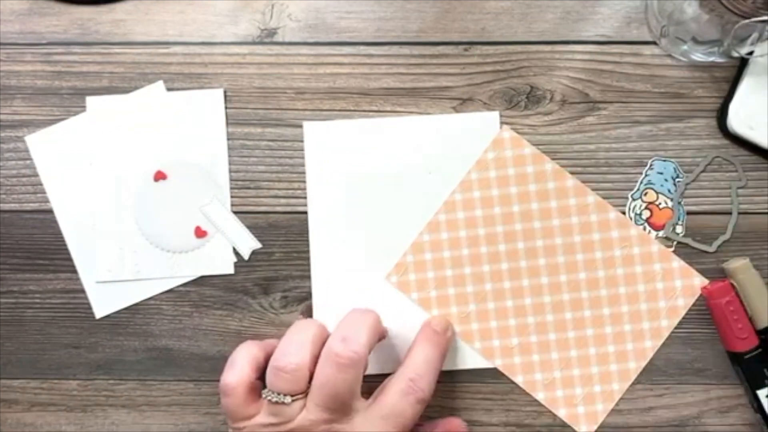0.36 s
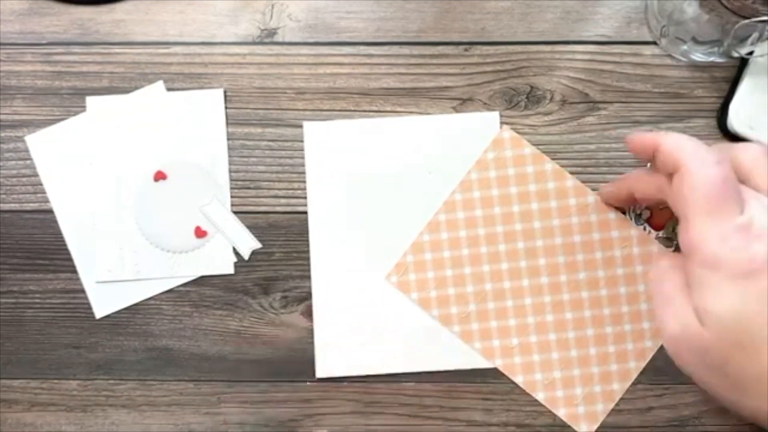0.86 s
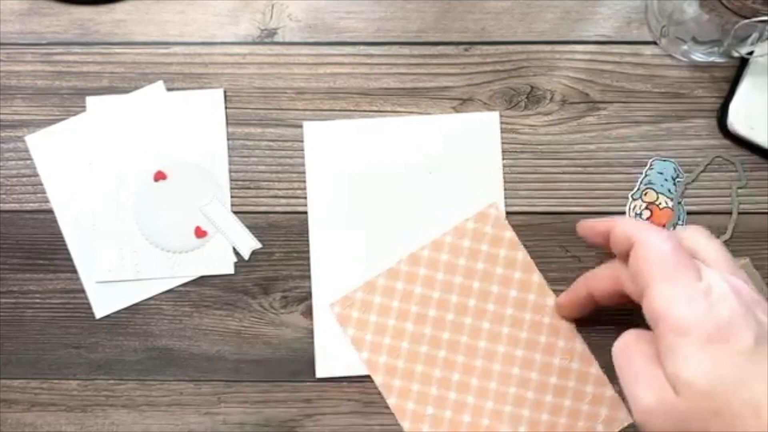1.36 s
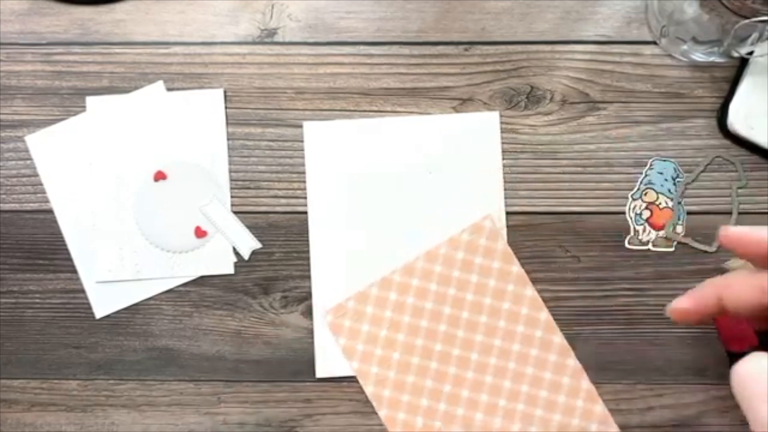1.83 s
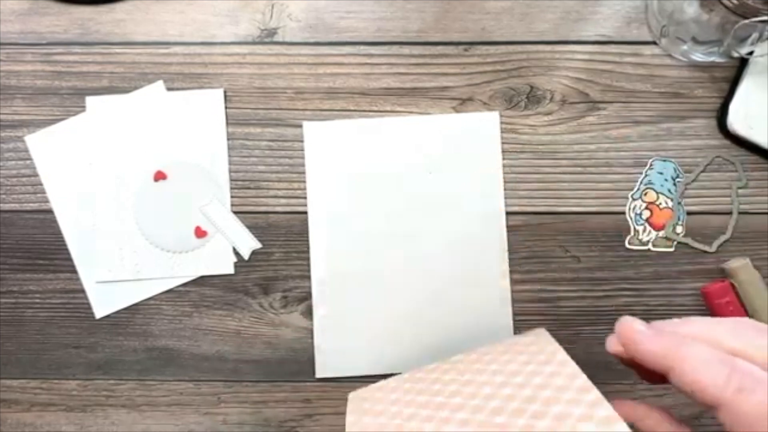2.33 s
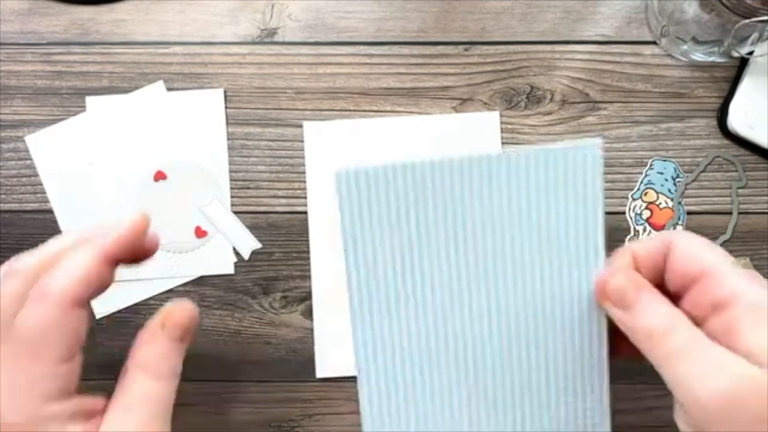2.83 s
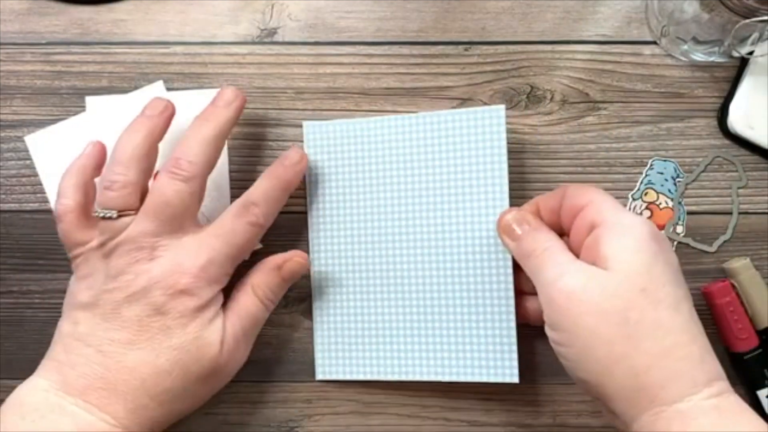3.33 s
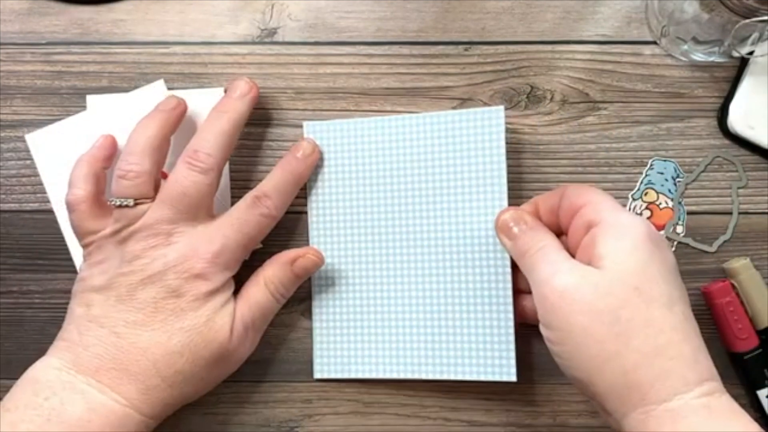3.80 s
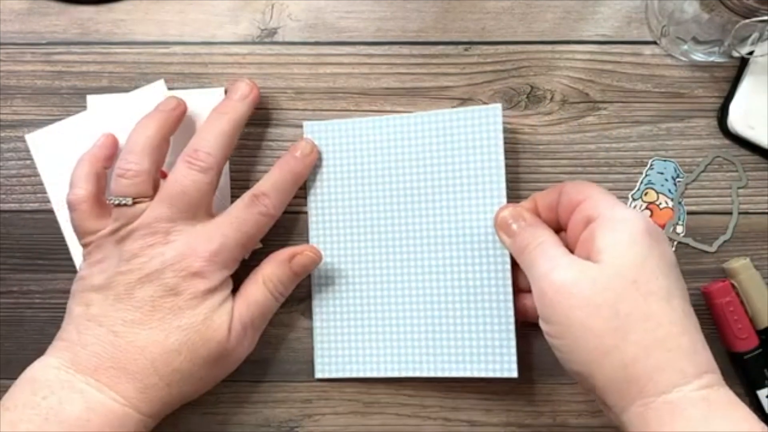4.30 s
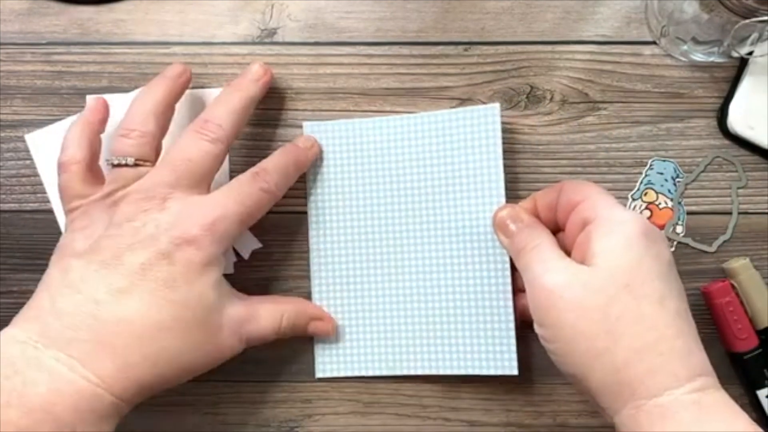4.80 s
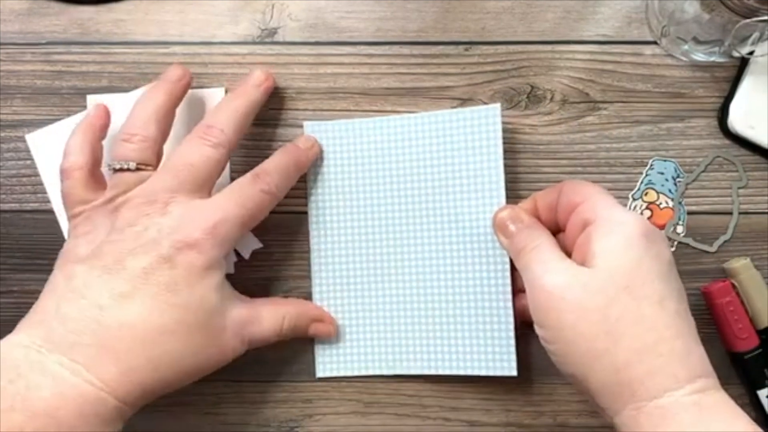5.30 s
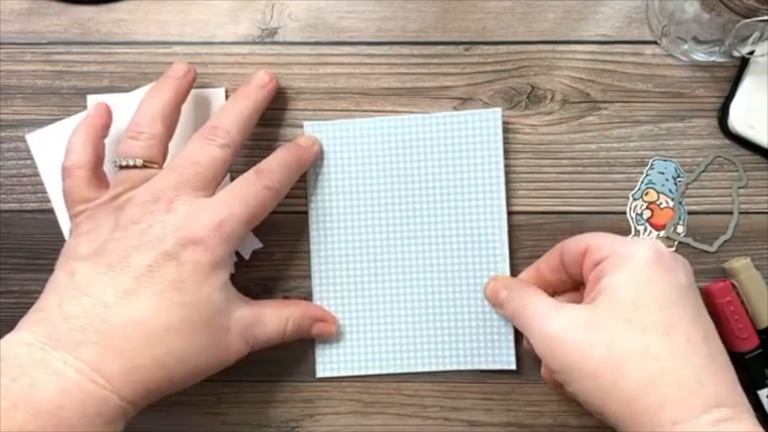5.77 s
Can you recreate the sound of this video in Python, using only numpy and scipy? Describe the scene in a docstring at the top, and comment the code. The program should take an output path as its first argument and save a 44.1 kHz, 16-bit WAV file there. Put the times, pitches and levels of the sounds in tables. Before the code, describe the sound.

Close stereo pickup of a wooden table in a quiet room. Faint paper rustle and crisp edge snaps lead to a loud hard knock with quick bounces. Paper then hisses across the wood in several strokes, with a firm fingertip thump between. Softer finger taps follow, then tiny dry card nudges that fade away, and finally one short ringing card scrape over a low rumble.

```python
"""Close above a wooden table in a quiet room: a sheet of paper is dragged over the wood and its edges snap,
fingertips thump down, something hard knocks and bounces, and a card is nudged and slid over another card.
Blows ring the modes of the table top; rubbing is clumped noise, hissing for paper and ringing for the card.
A low room rumble and a faint hiss lie under it all."""
import sys
import numpy as np
from scipy import signal
from scipy.fft import rfft, irfft
from scipy.io import wavfile
from scipy.ndimage import uniform_filter1d

SR = 44100
rng = np.random.default_rng(int(sys.argv[2]) if len(sys.argv) > 2 else 0)


def int16_out(signal):
    """Quantize to a 16-bit WAV file."""
    q = np.round(np.clip(np.atleast_2d(signal).T, -1, 1) * 32767)
    wavfile.write(sys.argv[1], SR, q.astype(np.int16))


def nominal_scale(level):
    """Amplitude ratio for a level in decibels (scalar or array-like)."""
    x = np.asarray(level, float) / 20
    return 10 ** x


N = 271206  # length in samples


def evened(x):
    """Scales to rms 1."""
    return x / np.sqrt(np.mean(x ** 2) + 1e-20)


def read(points, hz):
    """Reads a table on a log-frequency axis."""
    f, value = np.transpose(points)
    return np.interp(np.log(hz + 1), np.log(f + 1), value)


def spectrum(points):
    """A gain function from a dB table."""
    return lambda hz: nominal_scale(read(points, hz))


def add(mix, s, sound):
    """Mixes a stereo sound in at s seconds."""
    part = mix[:, round(s * SR):][:, :sound.shape[1]]
    part += sound[:, :part.shape[1]]


def coloured(pair, gain, same):
    """Two unrelated signals become a stereo pair of given spectrum and likeness, at rms 1."""
    hz = np.fft.rfftfreq(pair.shape[1], 1 / SR)
    a, b = rfft(pair) * gain(hz)
    likeness = np.clip(read(same, hz), -1, 1)
    right = likeness * a + np.sqrt(1 - likeness ** 2) * b
    return evened(irfft(np.array([a, right]), pair.shape[1]))


# stereo image of the near sources: pitch_hz, likeness (left to right, 1 = same)
NEAR_LIKENESS = [(60, 0.99), (180, 1), (550, 0.76), (1650, 0.79), (4500, 0.46)]


def near(pair, gain):
    """A coloured pair with the stereo image of a source close to the microphone."""
    return coloured(pair, gain, NEAR_LIKENESS)


def fibres(spread_db, clump_db, clump_s):
    """Friction: countless fibre slips of uneven size that come in clumps."""
    size = nominal_scale(spread_db * np.minimum(rng.exponential(1, (2, N)), 5))
    smooth = np.exp(-(np.arange(-900, 900) / SR / clump_s) ** 2)
    clumps = evened(signal.oaconvolve(rng.standard_normal(N), smooth, "same"))
    return rng.standard_normal((2, N)) * size * nominal_scale(clump_db * clumps)


def stroke(times, db):
    """Gain over time of one hand stroke; silent before and after."""
    t = np.arange(N) / SR
    moving = (t >= times[0]) & (t < times[-1])
    return uniform_filter1d(nominal_scale(np.interp(t, times, db)) * moving, size=200)


# colour of rumble and hiss: pitch_hz, level_db (relative)
AIR_COLOUR = [(12, -40), (20, -9.5), (37, -2.5), (86, -2), (182, -19), (270, -19.5), (558, -27.5),
              (660, -30), (1090, -32), (1220, -34.5), (2320, -35), (2750, -36.5), (16000, -48.5)]
# stereo image of the air: pitch_hz, likeness (left to right)
AIR_LIKENESS = [(60, 0.63), (180, -0.2), (550, 0.25), (1650, -0.12)]


def air():
    """Room rumble and hiss, swelling a little on slow waves of 0.3 to 5 Hz."""
    t = np.arange(N) / SR
    level_db, swell_db = -68.5, 0.76
    waves = (np.sin(2 * np.pi * (f * t + rng.random())) / np.sqrt(f) for f in np.geomspace(.3, 5, 20))
    swell = evened(sum(waves))
    noise = coloured(rng.standard_normal((2, N)), spectrum(AIR_COLOUR), AIR_LIKENESS)
    return nominal_scale(level_db + swell_db * swell) * noise


# passes of paper over wood, one list each: start_s, hiss_db, body_db (before the trims below)
DRAG_PASSES = [
    [(0.0, -83, -66.5), (0.09, -89, -68.5), (0.212, -73.5, -71), (0.3, -81, -81.5), (0.336, -81, -96),
     (0.38, -67.5, -82), (0.4, -80, -79.5), (0.428, -85.5, -73.5)],
    [(0.8, -99.5, -86.5), (0.862, -86.5, -84.5), (0.894, -70.5, -81), (0.94, -85.5, -78), (0.99, -58, -76),
     (1.05, -63, -75.5), (1.19, -60, -76), (1.27, -62, -73.5), (1.36, -62.5, -79.5), (1.492, -72.5, -81),
     (1.538, -102, -91)],
    [(1.742, -81, -87), (1.786, -77, -78), (1.892, -82, -77.5), (1.966, -71.5, -87.5), (2.02, -82.5, -102),
     (2.048, -71.5, -82), (2.082, -82, -80), (2.11, -78, -71.5), (2.145, -61.5, -78), (2.205, -64.5, -79.5),
     (2.244, -95, -94), (2.3, -106, -100)],
    [(2.35, -105, -105), (2.396, -92, -82), (2.446, -104, -90.5), (2.476, -83, -79.5), (2.514, -105, -90),
     (2.62, -81, -84.5), (2.646, -76, -77.5), (2.742, -92.5, -78.5), (2.79, -104, -87.5)],
]
# colour of paper on grain: pitch_hz, level_db (relative)
DRAG_HISS_COLOUR = [(900, -39), (1500, -16), (3000, 1.5), (4800, 3), (7200, -2), (11000, -6.5), (14000, -9),
                    (15500, -19)]
# colour of the dull flapping sheet: pitch_hz, level_db (relative)
SHEET_COLOUR = [(500, -32), (800, -4), (1400, -4.5), (2200, -7), (3500, -23.5)]
# extra treble hiss of the paper: level_db for each pass
TREBLE_DB = [-7, -5.5, -5.5, -28]


def drags():
    """Fine slips hiss on the grain, with the duller flap of the sheet in coarser ones."""
    hiss = near(fibres(1.4, 1.7, .004), spectrum(DRAG_HISS_COLOUR)) * nominal_scale([[3.5], [2.5]])
    body = near(fibres(2.5, 1.5, 0.0066), spectrum(SHEET_COLOUR)) * nominal_scale(2.5)
    treble_hz = 7600
    treble = signal.lfilter(*signal.butter(2, treble_hz, 'high', fs=SR), hiss)
    out = np.zeros((2, N))
    for rows, treble_db in zip(DRAG_PASSES, TREBLE_DB):
        s, hiss_db, body_db = np.transpose(rows)
        out += (hiss + nominal_scale(treble_db) * treble) * stroke(s, hiss_db)
        out += body * stroke(s, body_db)
    return out


# colour of the shaken table top: pitch_hz, level_db (relative)
MURMUR_COLOUR = [(60, -13), (150, -4), (300, -4.5), (470, -2.5), (650, -12.5), (1000, -40.5)]
# table murmur over the sheet body, low while the sheet is being lifted: level_db for each pass
DRAG_WEIGHT = [4.5, 10, -12, 5.5]


def murmur():
    """Every stroke shakes the table top a little, heard as low noise."""
    shake = near(rng.standard_normal((2, N)), spectrum(MURMUR_COLOUR))
    dragged = np.zeros(N)
    for rows, weight_db in zip(DRAG_PASSES, DRAG_WEIGHT):
        s, _, body_db = np.transpose(rows)
        dragged += stroke(s, body_db + weight_db)
    slide_db, fade_db_per_s, swell_in_s = -67, -25.5, 0.02  # murmurs most as the slide sets off
    slide = np.array([SLIDE_PATH[1][0], SLIDE_PATH[-1][0]])
    slid = stroke(slide, slide_db + fade_db_per_s * (slide - slide[0]))
    slid = slid * np.clip((np.arange(N) / SR - slide[0]) / swell_in_s, 0, 1)
    nudge_db = -5.5  # against the card's ring
    return shake * (dragged + slid + nominal_scale(nudge_db) * pushes())


# small snaps of paper edges: start_s, level_db (before a 5 dB cut), low_ring_hz, high_ring_hz,
# pan_db (left over right)
EDGE_SNAPS = [(0.0338, -42.5, 2650, 10550, 9), (0.0442, -36.5, 2480, 4310, 2), (0.124, -67, 1570, 6800, -3),
              (0.1391, -59, 4900, 6800, -7), (0.192, -34, 10100, 14800, -7),
              (0.2163, -29.5, 9600, 12760, 0), (0.2266, -39, 10200, 14700, 3),
              (0.2445, -50, 2530, 4360, -4), (1.4033, -49.5, 2340, 2940, 0), (2.387, -65, 2750, 4290, 3),
              (2.47, -66, 2905, 4360, 14), (2.645, -57.5, 2510, 3720, 8), (2.665, -60, 2760, 5080, 11),
              (3.335, -69.5, 1050, 1926, 1.5), (3.3902, -71, 1060, 1700, 10), (3.4955, -76, 1960, 4140, 4),
              (3.7642, -61, 2140, 7160, 6), (4.7603, -66.5, 2240, 2530, 4), (5.4665, -56, 2273, 2895, 9),
              (5.623, -44, 2280, 3900, 8), (5.8421, -62, 2426, 3670, 2)]


def snaps():
    """Each snap is a wide puff with two short rings; the higher its upper ring, the sooner it dies."""
    out, t = np.zeros((2, N)), np.arange(2048) / SR
    t60_at_4khz_s, rise_s, ring_width = 0.034, .0005, 0.038  # width as a share of the ring pitch
    for s, db, low_hz, high_hz, pan_db in EDGE_SNAPS:
        def colour(hz):
            """A flat puff above 800 Hz with two peaks."""
            rings = sum(1 / (1 + ((hz / ring_hz - 1) / ring_width) ** 2) for ring_hz in (low_hz, high_hz))
            return (hz > 800) * (0.079 + rings)

        puff = near(rng.standard_normal((2, 2048)), colour)
        t60_s = t60_at_4khz_s * 4000 / high_hz
        shape = nominal_scale(db - 5 - 60 * t / t60_s) * np.minimum(t / rise_s, 1)
        add(out, s, puff * shape * nominal_scale([[pan_db / 2], [-pan_db / 2]]))
    return out


# what the table top rings with: pitch_hz, level_db, t60_s (left free),
# sideways (0 = centre, plus = left, minus = right; beyond 1 the far side flips sign)
TABLE_MODES = [(53.5, -7.5, 0.97, -0.29), (63.44, -10, 0.36, -0.24), (90.9, -3, 0.45, -1.7),
               (151, -0.5, .2, -1.1), (163.8, -5, 0.37, -0.22), (193.4, 1.5, 0.17, 1),
               (214.8, -3.5, 0.21, -0.94), (259.8, -10.5, 0.48, 0.48), (336, -9.5, 0.11, -1.1),
               (359, -3.5, 0.07, 0.64), (450.4, -10, 0.18, -0.087), (461, -10.5, 0.23, 0.14),
               (581, -11, 0.22, -.3), (576, -7.5, 0.063, -1.5), (657, -1, 0.069, 1),
               (707, -11.5, .08, 0.85), (743, -3, 0.059, -1.6), (852, -4, 0.08, .8), (967, -5, 0.17, -.6),
               (1050, -11, 0.23, 1), (1160, -10, 0.24, .4), (1270, -14.5, .07, -0.66),
               (1330, -16, 0.1, 0.29), (1717, -13, 0.098, 1), (2055, -11, .04, .7), (3100, -24, .05, .4)]
# colour of the hard contact itself: pitch_hz, level_db (relative)
CRACK_COLOUR = [(700, -21), (1200, -3.5), (2300, -15), (3300, -13), (5000, -19.5), (7000, -26.5),
                (11000, -34), (15500, -44)]


def blow(force_db, contact_ms, place, share, build_cycles, heft_db, crack_db):
    """A half-sine push rings the modes by where it lands; long soft contacts leave the high ones still."""
    t = np.arange(SR // 2) / SR
    hz, db, t60_s, sideways = np.transpose(TABLE_MODES)[:, :, None]
    resting_t60_s = 0.33  # arms resting on the top cut the longest rings short
    swell = 1 - np.exp(-(t * hz / build_cycles) ** 2)  # low bending waves are slow to build up
    decay = nominal_scale(db - 60 * t / (t60_s * share) - 60 * t / resting_t60_s)
    modes = swell * decay * np.sin(2 * np.pi * hz * t)
    # plate mode shape: wave number grows as the root of pitch
    struck = modes * np.sin(np.pi * place * np.sqrt(hz / 45))
    struck *= nominal_scale(heft_db / (1 + (hz / 150) ** 4))  # a heavy hand drives the whole top
    ring = np.array([((1 + sideways) * struck).sum(0), ((1 - sideways) * struck).sum(0)])
    push = np.sin(np.pi * np.clip(t[:600] / (contact_ms / 1000), 0, 1))
    thud = nominal_scale(force_db) * signal.oaconvolve(ring, push[None] / push.sum())[:, :len(t)]
    crack_t60_s, crack_rise_s = 0.036, 0.00056
    burst = nominal_scale(crack_db - 60 * t / crack_t60_s) * np.minimum(t / crack_rise_s, 1)
    crack = near(rng.standard_normal((2, 4096)), spectrum(CRACK_COLOUR))
    crack = np.pad(crack, ((0, 0), (0, len(t) - 4096)))
    return crack * burst - thud


# fingertips come down: start_s, force_db, contact_ms, place (struck, 0-1), heft_db (on the lowest modes),
# share (of the modes' t60, short where the finger stays down)
FINGER_THUMPS = [(0.356, -57.5, 2.2, 0.73, 18, 0.47), (1.731, -39, 2.87, 0.348, -5, 1.25),
                 (2.404, -55, 1.35, 0.525, -6.5, 0.88), (2.473, -53, 1.25, 0.51, -1, 0.59),
                 (2.904, -52, .9, 0.18, 7, 0.94), (2.918, -54, 1.6, 0.29, 4, 0.88),
                 (3.185, -46.5, 1.32, 0.805, 12, 0.9), (3.222, -55, 2.1, 0.82, 3.5, 1.25),
                 (3.522, -42.5, 1.95, 0.33, 2.5, 0.49), (5.888, -51, 5.9, 0.33, 4, 0.34)]


def thumps():
    """Soft, long contacts of the fingertips, each with the faint tick of the nail."""
    out = np.zeros((2, N))
    build_cycles, tick_db = 1.2, -36.5  # the tick lies far under the force
    for s, force_db, contact_ms, place, heft_db, share in FINGER_THUMPS:
        add(out, s, blow(force_db, contact_ms, place, share, build_cycles, heft_db, force_db + tick_db))
    return out


# a hard thing knocks and bounces: start_s, force_db, contact_ms, place (struck, 0-1), crack_db
BOUNCING_KNOCKS = [(0.429, -33, 0.23, 0.82, -33.5), (0.4331, -13, 0.97, 0.22, -22),
                   (.449, -21.5, 0.14, 0.5, -29), (0.4812, -29, 0.95, 0.4, -32.5),
                   (0.4939, -25, 0.78, 0.3, -32), (0.507, -36, 0.79, .27, -40),
                   (0.5438, -22, 0.46, 0.02, -39), (0.547, -45.5, 0.43, .25, -38)]


def knocks():
    """Short hard contacts; the drive of the lowest modes grows as the thing settles flat."""
    out = np.zeros((2, N))
    share, build_cycles = 0.79, .6  # share of the modes' t60
    first_heft_db, heft_db_per_s = -20.5, 89.5
    for s, force_db, contact_ms, place, crack_db in BOUNCING_KNOCKS:
        heft_db = first_heft_db + heft_db_per_s * (s - BOUNCING_KNOCKS[0][0])
        add(out, s, blow(force_db, contact_ms, place, share, build_cycles, heft_db, crack_db))
    return out


# short pushes of card on card: peak_s, length_s, push_db, main_ring_hz (as the card bends)
CARD_NUDGES = [(3.345, 0.033, -66, 1920), (3.391, 0.054, -69, 1850), (3.437, .12, -68.5, 1945),
               (3.506, 0.055, -64.5, 1910), (3.553, 0.072, -65, 2020), (3.685, 0.1, -77.5, 2030),
               (3.775, 0.044, -72.5, 2120), (3.82, 0.068, -76.5, 2070), (3.85, .06, -75.5, 2210),
               (3.973, 0.095, -72, 2020), (4.024, 0.034, -77.5, 1980), (4.152, 0.067, -83.5, 1960),
               (4.425, 0.11, -80, 2340), (4.768, 0.08, -75, 2222), (4.881, .08, -79, 2175),
               (4.938, .11, -75.5, 2200), (5.065, .05, -91, 2180)]


def pushes():
    """Gain of the short pushes: each swells quickly to its peak and fades."""
    rise, ends_db = 0.43, -17.5  # share of the length before the peak; both ends against the peak
    total = np.zeros(N)
    for s, length, db, _ in CARD_NUDGES:
        times = [s - rise * length, s, s + (1 - rise) * length]
        total += stroke(times, [db + ends_db, db, db + ends_db])
    return total


# stiff card resonances: ratio (to the main ring), width_hz, level_db (before a 13 dB lift),
# growth (dB gained per dB of pressure)
CARD_RINGS = [(0.552, 726, -15, -0.16), (0.803, 784, 0, 0.03), (0.999, 330, 11, 0.38), (1.1, 900, 1.5, 0.1),
              (1.35, 865, -4, 1.76)]


def card(slips, pressure):
    """The slips pass resonances that follow the bend of the card; pressure shifts their balance."""
    slide_hz = 2340
    bend = [(row[0], row[3]) for row in CARD_NUDGES]
    bend = sorted(bend + [(SLIDE_PATH[0][0], slide_hz), (SLIDE_PATH[-1][0], slide_hz)])
    start = round(bend[0][0] * SR) - 2048
    main_hz = np.interp(np.arange(start, N) / SR, *np.transpose(bend))
    pressure_db = 20 * np.log10(pressure[start:] + 1e-5)
    out = np.zeros((2, N))
    for ratio, width_hz, db, growth in CARD_RINGS:
        # shift the moving ring down to 0 Hz, low-pass it there, shift it back
        turn = np.exp(2j * np.pi * ratio * np.cumsum(main_hz) / SR)
        r = np.exp(-np.pi * width_hz / SR)
        ring = turn * signal.lfilter([(1 - r) ** 2], [1, -2 * r, r * r], slips[:, start:] / turn)
        out[:, start:] += nominal_scale(db + 13 + growth * (pressure_db + 54.5)) * ring.real
    return out


# the long slide of the card: start_s, pressure_db, hiss_db (relative to the pressure)
SLIDE_PATH = [(5.38, -92.5, -13.5), (5.422, -74.5, -5.5), (5.458, -71, -1.5), (5.467, -56.5, -8.5),
              (5.513, -57, -7), (5.529, -50, -9.5), (5.595, -61.5, 1.5), (5.624, -54.5, -6.5),
              (5.641, -58.5, 0.7), (5.726, -61.5, 5.5), (5.82, -75.5, 1.5), (5.835, -89.5, -11),
              (5.848, -76.5, 8), (5.879, -89.5, 10.5), (5.899, -100, -10)]
# colour of card rubbing on card: pitch_hz, level_db (relative)
CARD_HISS_COLOUR = [(1700, -14), (2900, -3), (3900, 1), (5400, -12), (6900, -12.5), (9000, -14.5),
                    (12000, -16), (15500, -20)]


def nudges_and_slide():
    """Coarser slips ring the stiff card; a thinner hiss rides above."""
    slips = fibres(3.6, 1.6, 0.002)
    short = pushes()
    s, slide_db, bright_db = np.transpose(SLIDE_PATH)
    pressure = short + stroke(s, slide_db)
    ring = card(near(slips, np.ones_like), pressure) * nominal_scale([[1.3], [.3]])
    hiss = near(slips, spectrum(CARD_HISS_COLOUR)) * nominal_scale([[1.6], [1.4]])
    nudge_hiss_db = -9.5  # against the push
    return ring * pressure + hiss * (nominal_scale(nudge_hiss_db) * short + stroke(s, slide_db + bright_db))


# how fast the early reflections die: pitch_hz, t60_s
ROOM_DECAY = [(100, 0.58), (500, 0.14), (2000, 0.32), (6000, 0.21), (14000, 0.1)]


def room(x):
    """Sparse reflections of random sign, each band dying at its own speed."""
    taps = np.zeros((2, SR // 2))
    slots = np.arange(200, SR // 2 - 20, 20)
    at = slots + rng.integers(0, 20, (2, len(slots)))
    np.put_along_axis(taps, at, rng.choice([-1., 1.], at.shape), 1)
    hz, t, z = signal.stft(taps, SR, nperseg=256)
    early = nominal_scale(-60 * t / read(ROOM_DECAY, hz)[:, None])
    late = nominal_scale(-19.5 - 60 * t / 0.5)  # the far walls linger faintly
    tail = signal.istft(z * (early + late), SR, nperseg=256)[1]
    return signal.oaconvolve(x, tail / np.linalg.norm(tail[0]), axes=1)[:, :N]


def scene():
    """All sources on the table, their room, and the air."""
    hits = thumps() + knocks() + snaps()
    rubs = drags() + nudges_and_slide() + murmur()
    return hits + rubs + room(nominal_scale(-12.5) * hits + nominal_scale(-13.5) * rubs) + air()


def top_cut(x):
    """Nothing passes above the cut-off."""
    return signal.sosfilt(signal.butter(12, 16360, fs=SR, output="sos"), x)


# tone of the microphone: pitch_hz, gain_db
MICROPHONE_TONE = [(20, -22), (35, -8), (60, 2), (14900, -1), (15400, -25)]
# stereo width: pitch_hz, share (of the side signal kept)
STEREO_WIDTH = [(170, 0.3), (330, 1), (5200, 1), (6500, 0.36)]
# phase between the microphone ports: pitch_hz, half_turns (by which left leads)
PORT_PHASE = [(7700, 0), (8500, 1), (9700, 1), (10400, 2), (11900, 2), (12600, 3), (13800, 3), (14500, 4)]


def record(dry):
    """Microphone tone; bass near mono; treble alike in both channels but turning in phase between ports."""
    hz = np.fft.rfftfreq(N, 1 / SR)
    left, right = rfft(dry) * nominal_scale(read(MICROPHONE_TONE, hz))
    width = np.clip(read(STEREO_WIDTH, hz), 0, 1)
    mid = (left + right) / 2 * np.sqrt(2 - width)  # a narrower image gets a louder middle
    side = (left - right) / 2 * width
    turn = np.exp(.5j * np.pi * read(PORT_PHASE, hz))
    mix = irfft(np.array([(mid + side) * turn, (mid - side) / turn]), N)
    return top_cut(mix)


dry = scene()
out = record(dry)
int16_out(out)
```